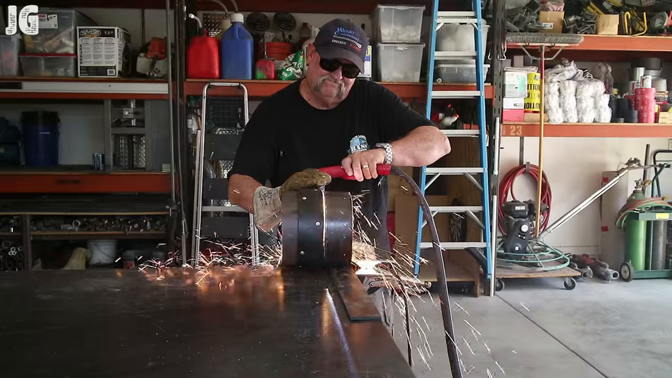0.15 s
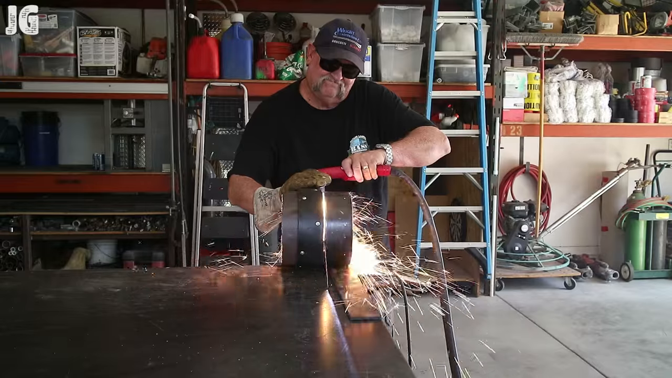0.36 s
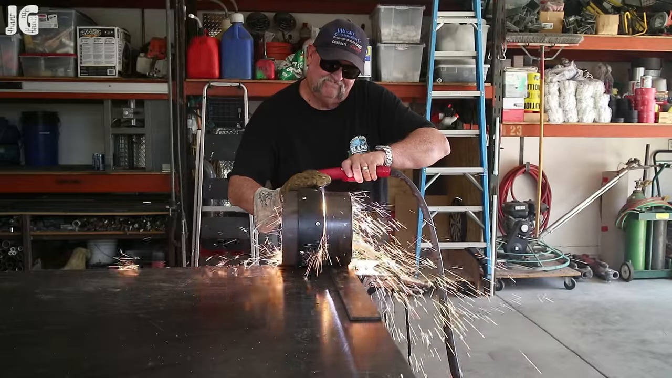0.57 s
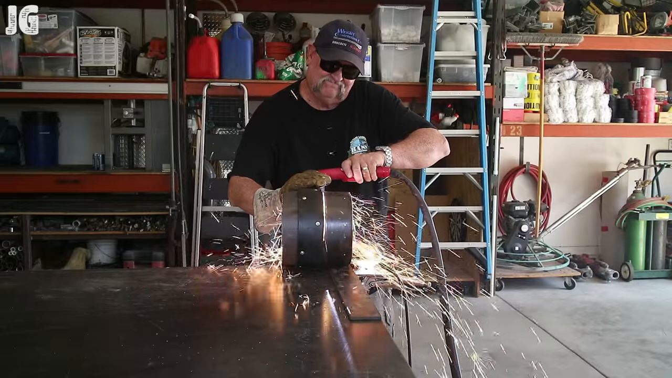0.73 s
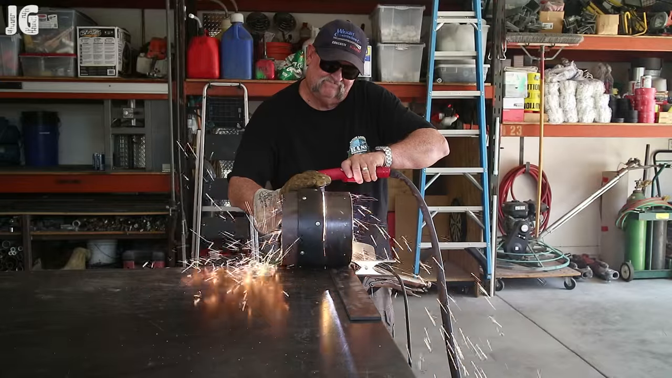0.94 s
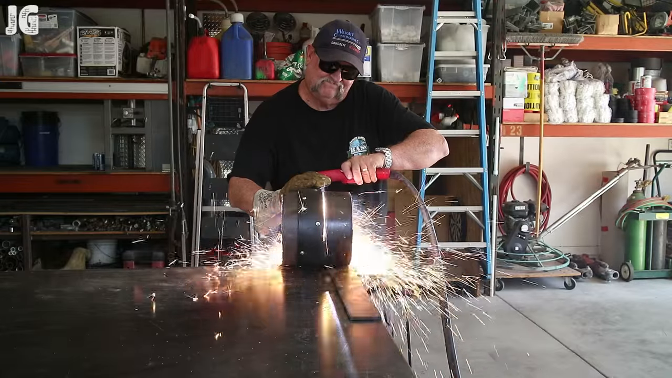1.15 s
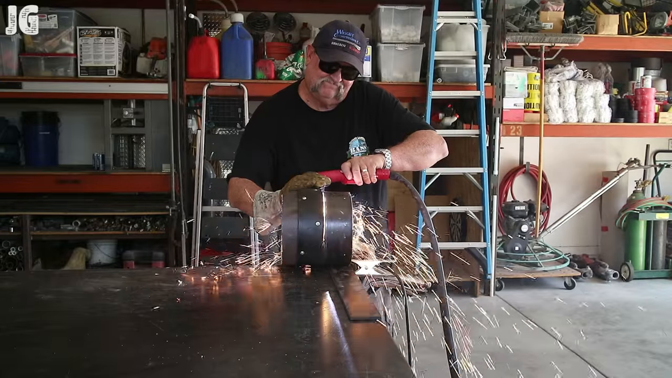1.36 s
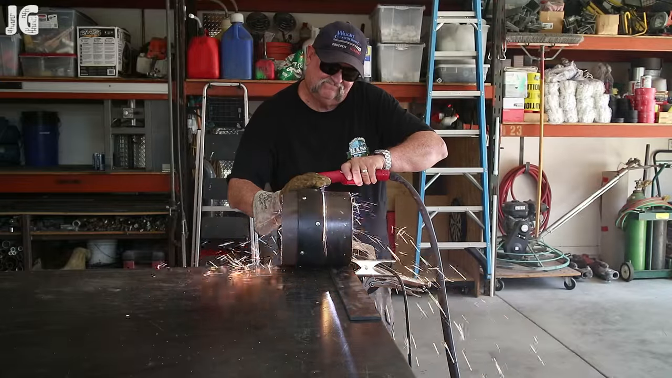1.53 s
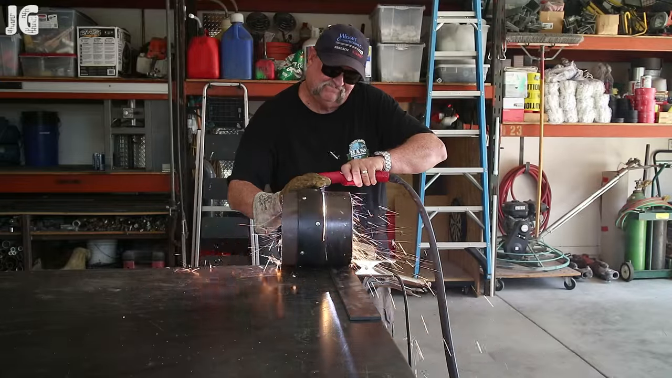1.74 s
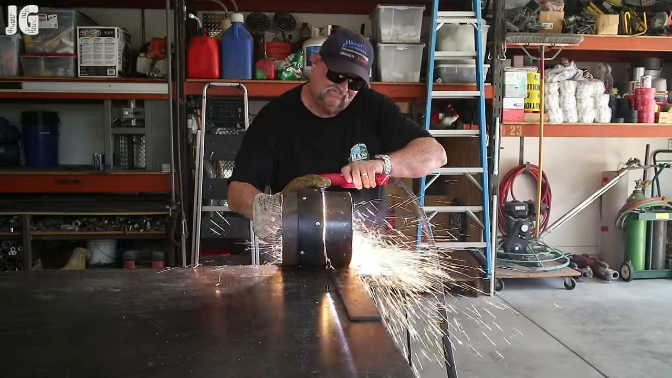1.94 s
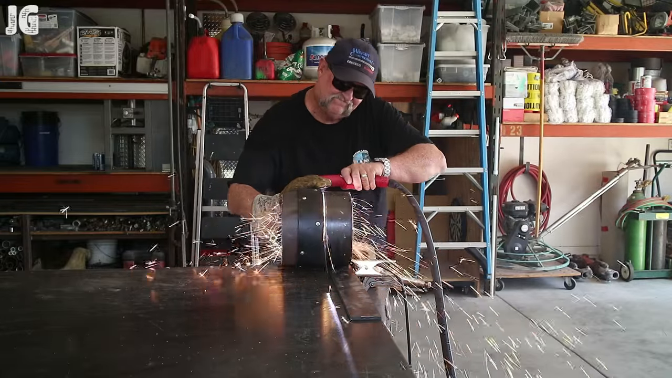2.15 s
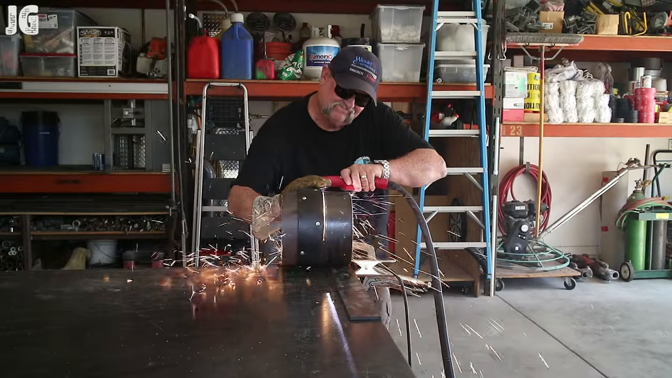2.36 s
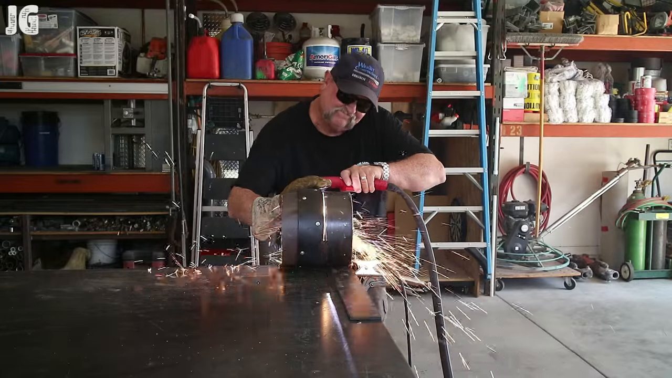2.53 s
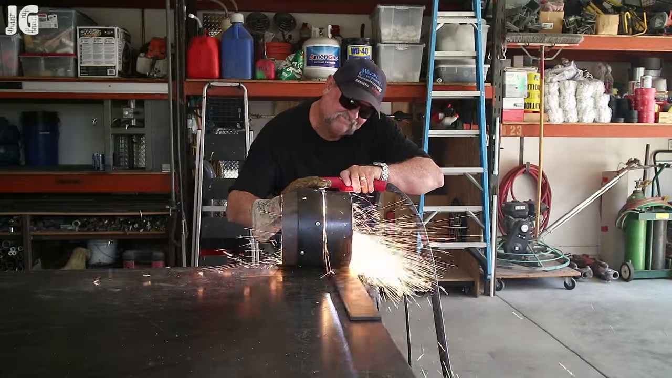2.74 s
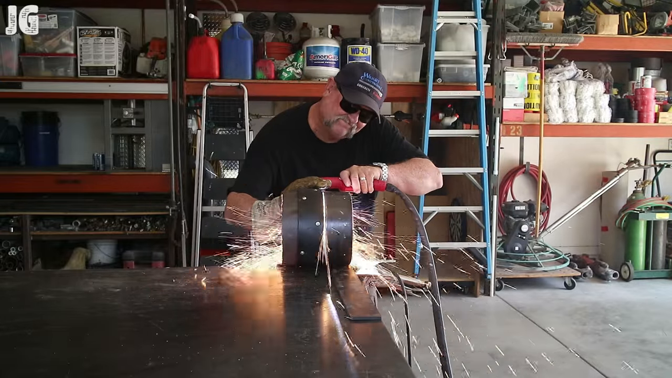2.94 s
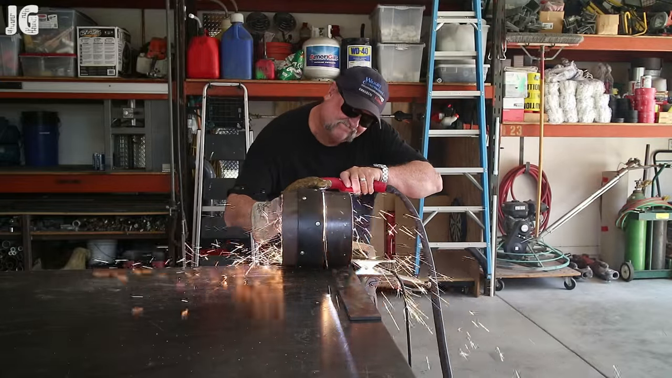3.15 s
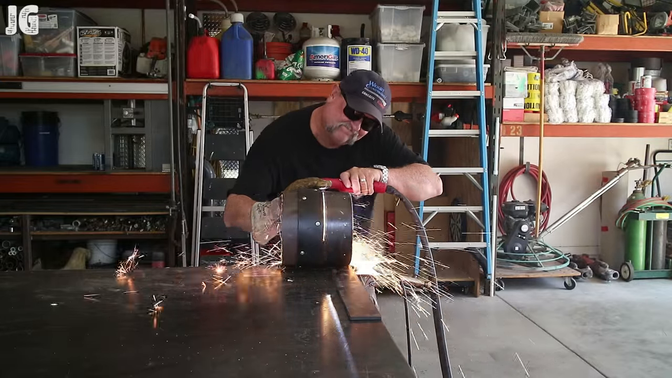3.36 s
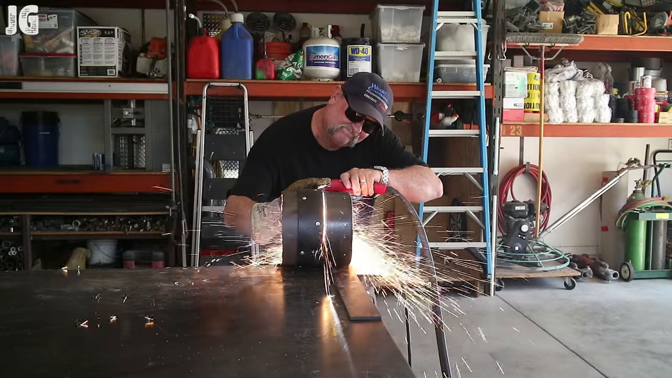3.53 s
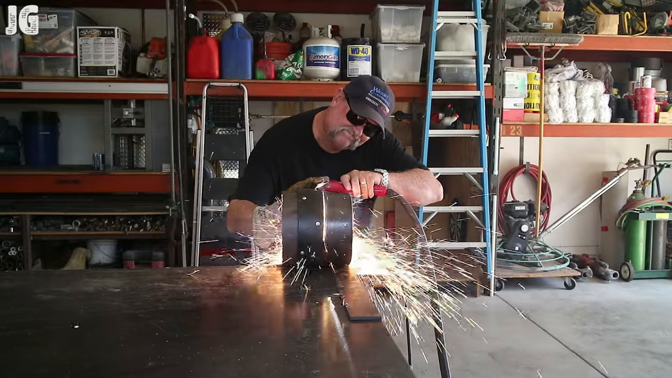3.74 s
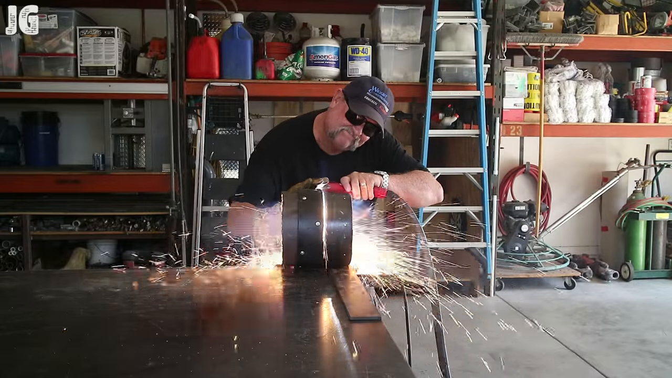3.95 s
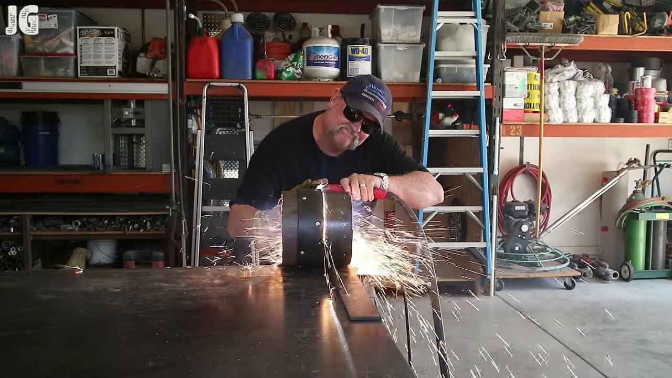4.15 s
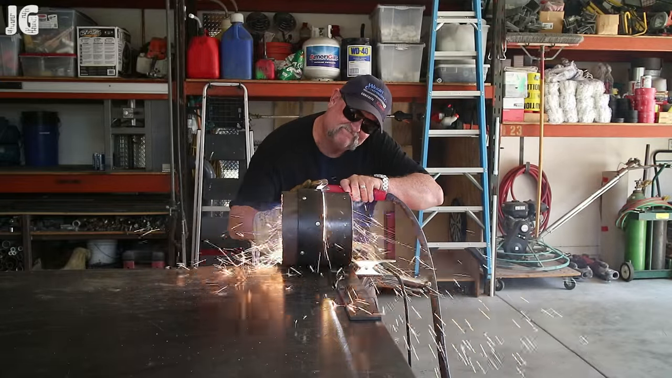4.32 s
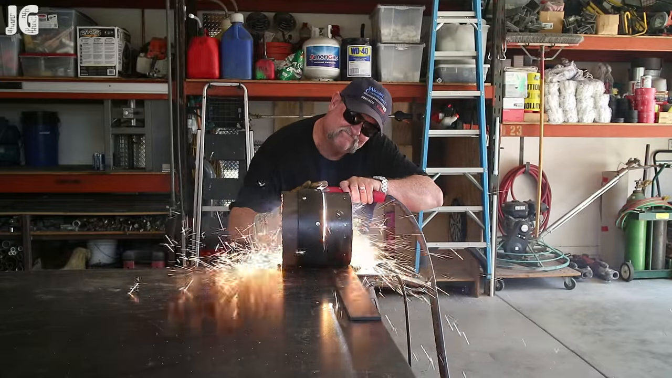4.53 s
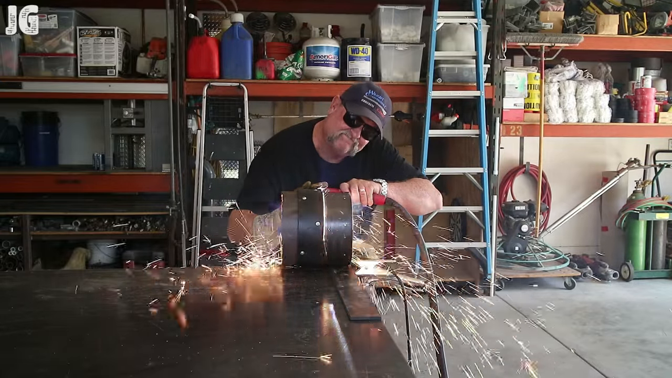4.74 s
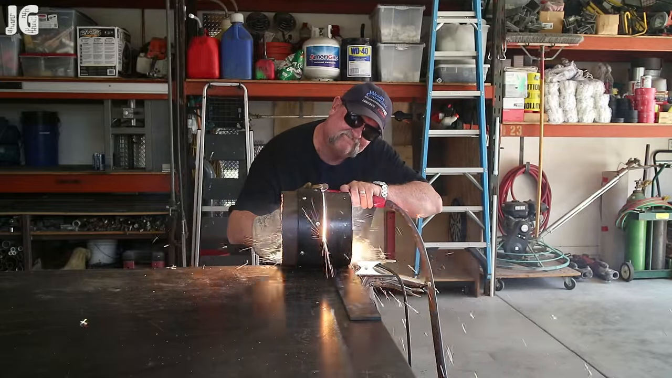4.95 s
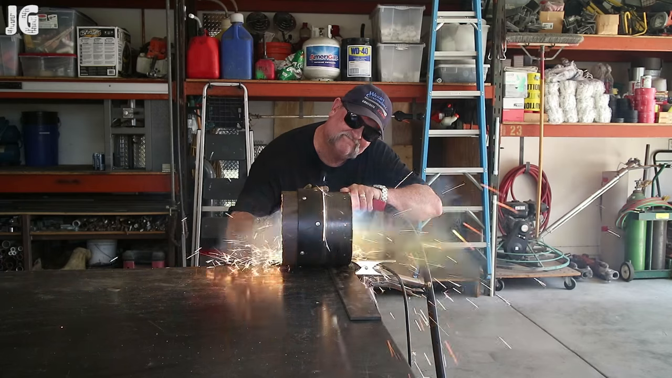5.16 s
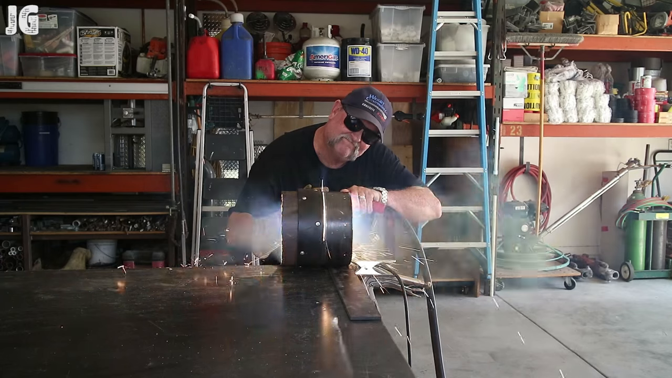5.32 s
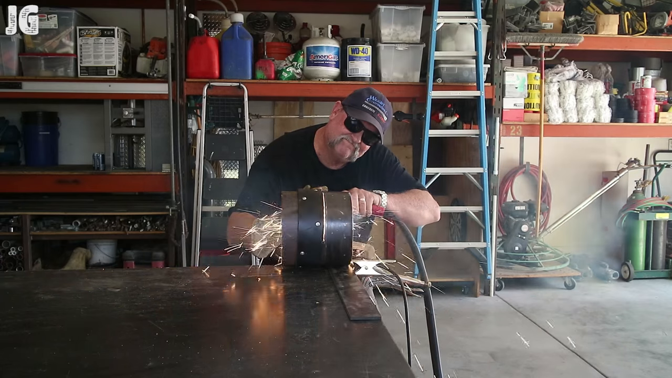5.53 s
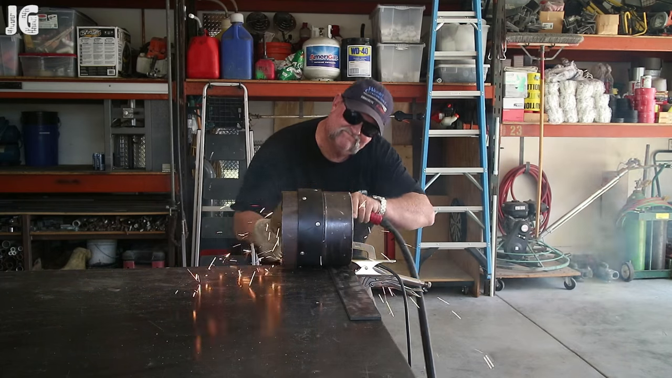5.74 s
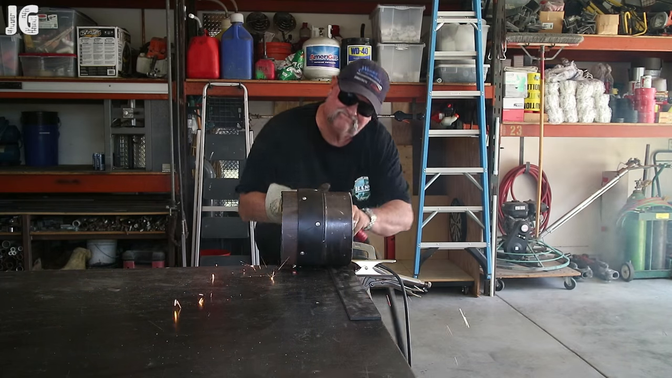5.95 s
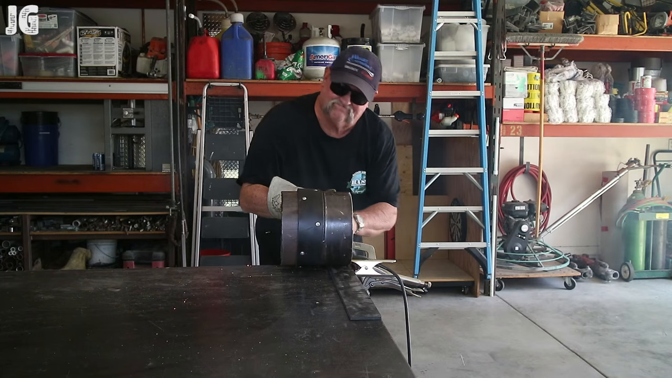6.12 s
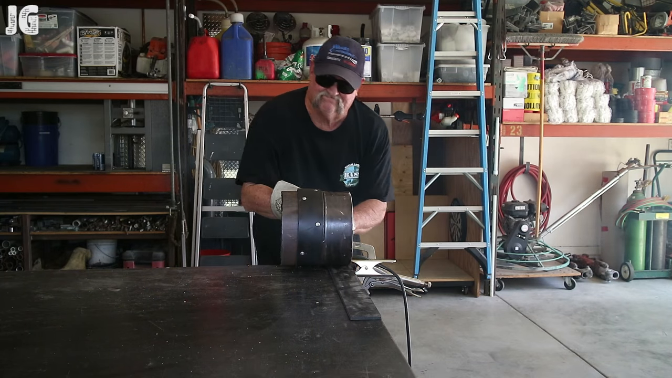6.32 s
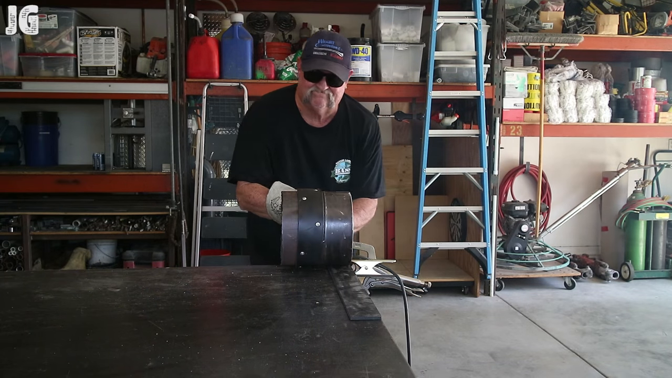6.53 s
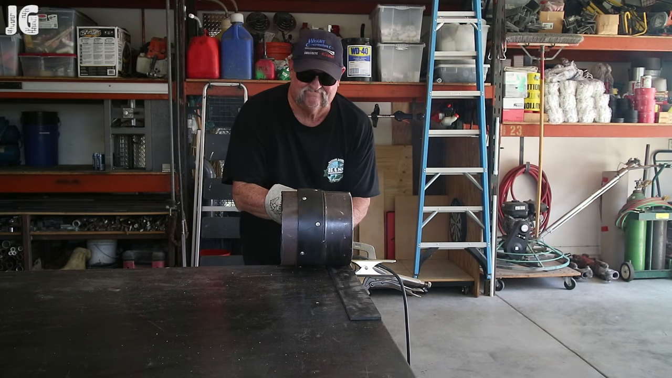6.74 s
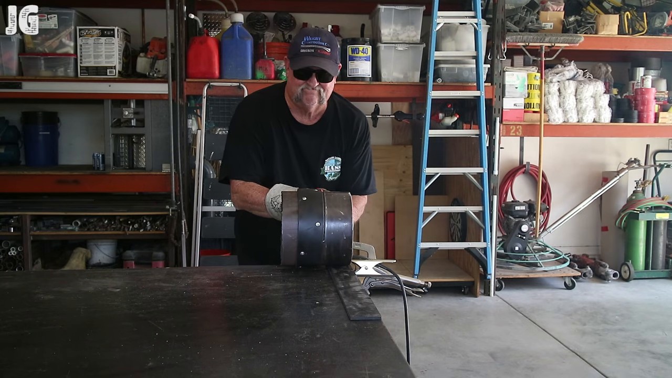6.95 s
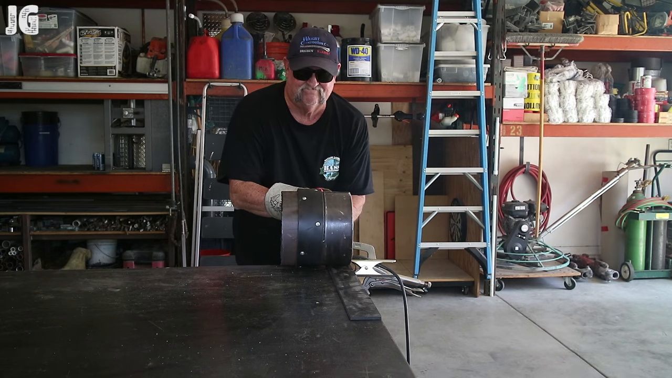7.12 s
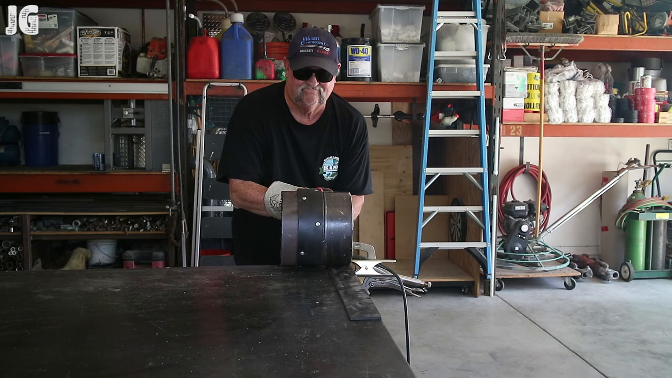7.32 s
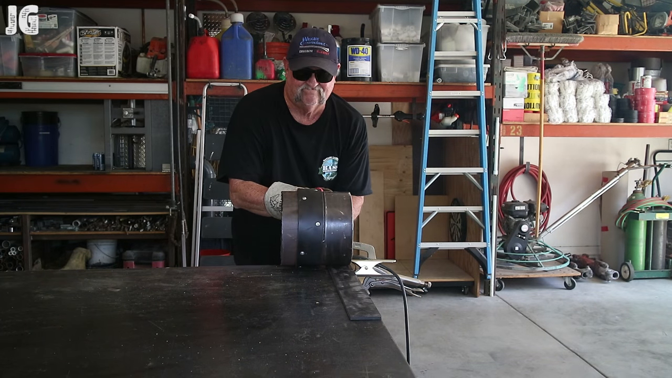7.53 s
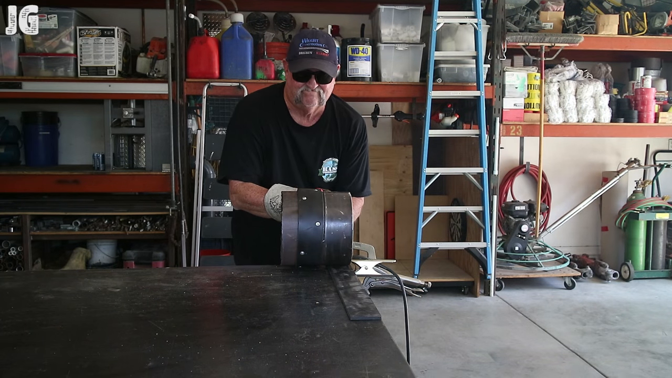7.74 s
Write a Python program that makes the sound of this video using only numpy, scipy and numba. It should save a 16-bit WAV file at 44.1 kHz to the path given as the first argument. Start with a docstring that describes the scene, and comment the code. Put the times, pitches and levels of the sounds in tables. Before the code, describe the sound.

A plasma torch cuts a steel tube with a bright, pitched hiss, topped by uneven sputtering and sizzling from molten metal. After about five and a half seconds the arc dies with a short pop. Cooling air keeps rushing from the torch, its whistling tone sinking, over the low hum of the power unit's fan. The sound is close and mono, with a short workshop reverb.

```python
"""A bright, pitched hiss with sputtering on top: a plasma torch cuts a steel tube in a workshop.
The arc jet rushes through the resonances of the torch's air duct, molten metal spits out of the kerf,
and the power unit's fan hums underneath. The arc dies with a pop and cooling air blows on. The duct's
pitches sink as the gas cools, and the mono microphone's gain control slowly opens up."""
import sys
import numpy as np
from scipy import signal
from scipy.fft import rfft, irfft
from scipy.io import wavfile
from scipy.ndimage import uniform_filter1d, minimum_filter1d
from numba import njit

SR = 44100
rng = np.random.default_rng(int(sys.argv[2]) if len(sys.argv) > 2 else 0)


def wav_out(sig):
    """Save sig, one row per channel (or a flat mono array), as 16-bit PCM at SR to the path in sys.argv[1]."""
    wavfile.write(sys.argv[1], SR, np.round(np.clip(np.atleast_2d(sig).T, -1, 1) * 32767).astype(np.int16))


N = 343098
ARC_OUT_S = 5.6655


def from_db(db):
    """Gain of a level in dB."""
    return 10 ** (np.asarray(db) / 20)


def rms_one(x):
    """The signal scaled to rms 1."""
    return x / np.sqrt(np.mean(x ** 2) + 1e-20)


def automation(rows):
    """One per-sample curve for each column after a table's time column."""
    time_s, *columns = np.transpose(rows)
    return [np.interp(np.arange(N) / SR, time_s, column) for column in columns]


def drift(rate_hz):
    """Slow random wander of rms 1: noise through two one-pole low-passes."""
    hop, settle = 40, 2000
    pole = np.exp(-2 * np.pi * rate_hz * hop / SR)
    noise = rng.standard_normal(N // hop + settle + 2)
    slow = signal.lfilter([1], [1, -2 * pole, pole * pole], noise)[settle:]
    return np.interp(np.arange(N) / hop, np.arange(len(slow)), rms_one(slow))


def turbulence(spectrum, flicker_db, gust_db, source=None):
    """Coloured noise whose third-octave bands flicker alone and gust together; rms 1."""
    hz = np.maximum(np.arange(N // 2 + 1) * SR / N, 1)
    points_hz, points_db = np.transpose(spectrum)
    white = rng.standard_normal(N) if source is None else source
    coloured = rfft(white) * from_db(np.interp(np.log(hz), np.log(points_hz), points_db, -90, -90))
    out = np.zeros(N)
    for band in range(round(3 * np.log2(points_hz[0])), round(3 * np.log2(points_hz[-1])) + 2):
        share = np.clip(1 - abs(3 * np.log2(hz) - band), 0, 1)
        out += irfft(coloured * share, N) * from_db(flicker_db * drift(9))
    return rms_one(out * from_db(gust_db * drift(14.7)))


def workshop(x, t60_s=0.48, wet_db=-12, predelay_s=0.008):
    """Room reverb: a dying noise tail, duller than the direct sound."""
    t = np.arange(round(0.8 * SR)) / SR
    tail = rng.standard_normal(len(t)) * from_db(-60 * t / t60_s) * (t > predelay_s)
    tail = signal.lfilter([1], [1, -0.4], tail)
    return from_db(wet_db) * signal.fftconvolve(x, tail / np.linalg.norm(tail))[:N]


def fan(rumble_db=-49.5):
    """The power unit's fan: a wavering blade tone and its octave over a low rumble."""
    # The fan speeds up a little once the arc no longer loads the supply: time_s, blade_rate_hz
    speed = [(0, 263.6), (5.75, 263.4), (6.2, 265.4), (7.78, 265.2)]
    # Blade tones: harmonic_number, relative_db
    harmonics = [(1, -45), (2, -60)]
    # Colour of the rumble: frequency_hz, relative_db
    spectrum = [(15, -72), (25, -42), (145, -21.5), (167, -13.5), (233, -7), (259, -2.5), (275, -7),
                (313, -11), (360, -19), (396, -18), (420, -5), (550, -35), (920, -120)]
    blade_hz = automation(speed)[0] + 0.294 * drift(2)
    phase = 2 * np.pi * np.cumsum(blade_hz) / SR
    hum = sum(np.sqrt(2) * from_db(db) * np.sin(k * phase) for k, db in harmonics)
    hum *= from_db(0.5 + 0.53 * drift(3.6))
    return hum + from_db(rumble_db) * turbulence(spectrum, flicker_db=0.8, gust_db=0.5)


@njit
def resonate(x, hz, width_hz, skew, sr):
    """Moving state-variable resonance; skew digs a dip below the peak and lifts its upper flank."""
    out = np.zeros(len(x))
    band_state = low_state = 0.0
    for i in range(len(x)):
        tuning, damping = np.tan(np.pi * hz[i] / sr), width_hz[i] / hz[i]
        band = (band_state + tuning * (x[i] - low_state)) / (1 + tuning * (tuning + damping))
        low = low_state + tuning * band
        band_state, low_state = 2 * band - band_state, 2 * low - low_state
        out[i] = damping * (band - skew * low)
    return out


def duct(jet, heat, skew=0.64):
    """Sound runs faster in hot gas, so the air column's modes move with the heat (0 cold, 1 hot)."""
    # Duct modes: hot_pitch_hz, cold_pitch_hz, hot_width_hz, cold_width_hz, hot_gain_db, cold_gain_db
    modes = [(752, 696, 136, 200, -1, -1), (1436, 1293, 133, 94, 9, 8), (2165, 1920, 98, 55, 6, 5),
             (2896, 2570, 103, 58, 8, 3.5), (3223, 3345, 236, 300, 7.5, 5), (3632, 3180, 112, 77, 11, 14),
             (4360, 3820, 80, 43, 1, 10.5), (5076, 4450, 70, 47, 2.5, 4.5), (5640, 5220, 150, 50, -4, -3),
             (6920, 5680, 100, 60, -0.5, -10.5), (8300, 6940, 220, 150, -1, -3),
             (9770, 8110, 270, 140, -3, -6)]
    out = jet.copy()
    for mode in modes:
        hz, width_hz, db = (cold + (hot - cold) * heat for hot, cold in zip(mode[::2], mode[1::2]))
        out += from_db(db) * resonate(jet, hz, np.maximum(width_hz, 10), skew, SR)
    return out


def cooling_air(heat):
    """Air rushes through the duct; rms 1 over the last second."""
    # Colour of the air jet: frequency_hz, relative_db
    spectrum = [(150, -33), (400, -1), (800, -3), (1100, -1), (1750, -4.5), (2400, 1), (3600, -3),
                (5500, -3), (9000, -4.5), (12000, -4), (15500, -6)]
    air = duct(turbulence(spectrum, flicker_db=0.77, gust_db=0.38), heat)
    return air / np.std(air[-SR:])


def pop(pitch_hz=800, t60_s=0.012, attack_s=0.0003, echo_s=0.0016, echo_db=-21):
    """The plasma column collapses: a suction pulse rings briefly and bounces off the table."""
    t = np.maximum(np.arange(N) / SR - ARC_OUT_S + 0.00029, 0)
    envelope = from_db(-1 - 60 * t / t60_s) * (1 - np.exp(-t / attack_s))
    pulse = -np.sin(2 * np.pi * pitch_hz * t) * envelope
    return pulse + from_db(echo_db) * np.roll(pulse, round(echo_s * SR))


def sizzle():
    """The cut's flickering, frying top end."""
    # Colour of the sizzle: frequency_hz, relative_db
    spectrum = [(4000, -19), (7000, -4), (9500, -3), (12000, -1.5), (14000, -2.5), (16000, 0)]
    return turbulence(spectrum, flicker_db=1.4, gust_db=1.4)


def sputter(droplets_per_s=3000):
    """Molten droplets tear loose from the kerf as dense, uneven clicks."""
    # Colour of the clicks: frequency_hz, relative_db
    spectrum = [(200, -28), (360, -12.5), (480, -2.5), (800, -1), (1100, -2.5), (1600, -2.5), (2200, -16)]
    clicks = (rng.random(N) < droplets_per_s / SR) * rng.standard_normal(N)
    accent_db = 2.85 * np.minimum(rng.exponential(1, N), 4)
    return turbulence(spectrum, flicker_db=1.0, gust_db=0.75, source=clicks * from_db(accent_db))


def arc_jet(heat):
    """The plasma jet hisses through the hot duct; rms 1."""
    # Colour of the arc jet: frequency_hz, relative_db
    spectrum = [(150, -40), (400, -15.5), (900, 1), (1400, -4), (1850, -4.5), (2600, 1.5), (4000, -3.5),
                (6000, -4.5), (9000, -8), (15000, -10.5)]
    return rms_one(duct(turbulence(spectrum, flicker_db=0.98, gust_db=0.5), heat))


def torch():
    """Jet, sputter and sizzle stop when the arc dies and uncover the air that blows throughout."""
    # Fader moves of the cut, each relative to its layer's trim: time_s, jet_db, sputter_db, sizzle_db
    cut_faders = [(0.0, -19, -38, -22), (0.01, -19.5, -31.5, -22.5), (0.27, -20.5, -31, -21.5),
                  (0.38, -21, -28, -22), (0.41, -19, -23.5, -16.5), (0.49, -22, -22.5, -25),
                  (0.6, -21.5, -29, -20), (0.61, -20, -35, -21.5), (0.88, -18.5, -28.5, -21),
                  (1.04, -20, -32, -19.5), (1.12, -19, -19, -23.5), (1.23, -22.5, -28.5, -28),
                  (1.28, -22, -24.5, -21), (1.35, -21, -38, -26), (1.42, -19, -38, -22.5),
                  (1.81, -20, -31, -20.5), (1.92, -21, -35, -23), (1.95, -20, -25, -21),
                  (2.08, -18.5, -27, -22), (2.1, -19, -36, -21.5), (2.3, -18.5, -33.5, -22),
                  (2.41, -18, -32, -22), (2.47, -18.5, -36, -21), (2.54, -18, -28, -18),
                  (2.55, -17.5, -40, -24), (2.57, -19, -29, -21), (2.74, -18, -34.5, -22.5),
                  (2.82, -20, -27, -20.5), (2.92, -19, -33, -21), (2.93, -18, -29.5, -20),
                  (3.41, -18.5, -33, -21.5), (3.44, -20, -28, -20), (3.56, -19, -29.5, -21.5),
                  (3.64, -22.5, -25.5, -22), (3.75, -18, -29, -25), (3.78, -20.5, -29, -25),
                  (3.85, -20, -25.5, -26), (3.86, -18, -28, -21), (4.1, -17.5, -27.5, -26),
                  (4.16, -18, -26, -17), (4.22, -20, -29, -27), (4.29, -18.5, -27, -28),
                  (4.3, -17.5, -33, -26), (4.35, -20.5, -24.5, -23), (4.36, -18.5, -27, -30),
                  (4.48, -17, -33, -23.5), (4.51, -17, -21, -29), (4.52, -19, -32, -28),
                  (4.56, -20, -25, -23), (4.7, -19.5, -28.5, -28), (4.84, -20, -35, -20.5),
                  (4.92, -17.5, -31, -24), (4.96, -18.5, -33, -19), (5.0, -21, -25.5, -27),
                  (5.08, -22, -27, -28), (5.12, -28.5, -37, -30), (5.22, -25.5, -26.5, -26.5),
                  (5.47, -21, -32, -24), (5.64, -21, -36.5, -24.5), (5.66, -20, -20, -24)]
    # Airflow as the gas cools: time_s, level_db, heat (0 cold, 1 hot)
    airflow = [(5.0, -32, 1.0), (5.67, -30, 0.94), (5.85, -36.5, .45), (6.1, -30.5, 0.22), (6.3, -35, .15),
               (6.6, -32.5, .06), (7.0, -30.5, .01), (7.4, -30.5, 0), (7.78, -31, 0)]
    jet_db, sputter_db, sizzle_db = automation(cut_faders)
    air_db, heat = automation(airflow)
    heat += 0.028 * drift(2.8)
    burning = np.arange(N) < ARC_OUT_S * SR
    jet = from_db(jet_db + 1.5) * arc_jet(np.where(burning, heat, 1))
    air = from_db(air_db) * cooling_air(heat)
    cut = jet + from_db(sputter_db + 0.5) * sputter() + from_db(sizzle_db) * sizzle()
    return burning * cut + air


def scene():
    """Torch and pop with room reverb over the dry fan; one microphone feeds both channels."""
    near = torch() + pop()
    return np.tile(near + workshop(near) + fan(), (2, 1))


def record(dry, target_db=-15, sense_s=0.08, hold_s=0.35, release_db_per_s=8, stopband_hz=15900):
    """Gain control holds after loud sound, then opens steadily; peaks are rounded, the top is cut."""
    level_db = 10 * np.log10(uniform_filter1d(dry[0] ** 2, round(sense_s * SR)) + 1e-12)
    hold = round(hold_s * SR) // 2 * 2 + 1
    held_db = -minimum_filter1d(-level_db, hold, origin=hold // 2)  # loudest level of the last hold_s
    ramp_db = release_db_per_s * np.arange(N) / SR
    released_db = np.maximum.accumulate(held_db + ramp_db) - ramp_db
    levelled = dry * from_db(np.clip(target_db - released_db, -6, 18))
    rounded = 1.5 * np.tanh(levelled / 1.5)
    return signal.sosfilt(signal.cheby2(16, 75, stopband_hz, fs=SR, output="sos"), rounded)


dry = scene()
out = record(dry)
wav_out(out)
```